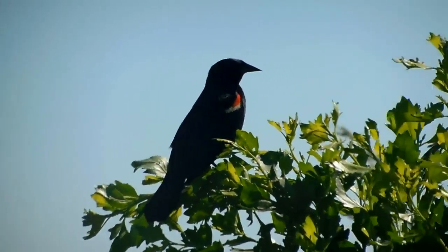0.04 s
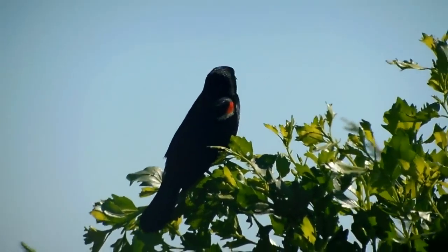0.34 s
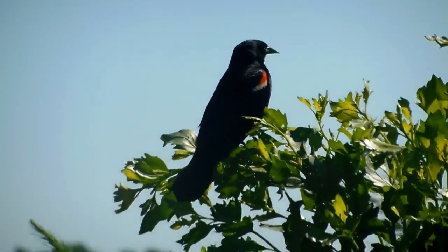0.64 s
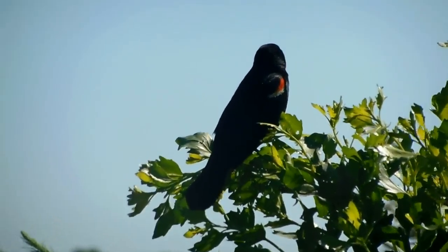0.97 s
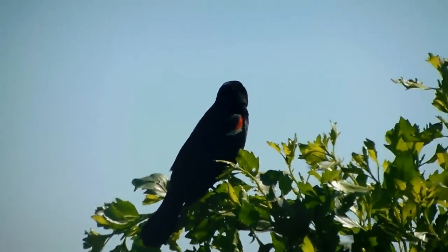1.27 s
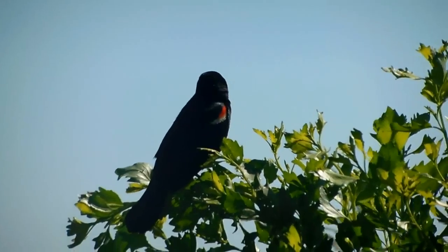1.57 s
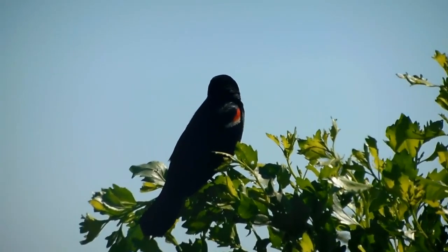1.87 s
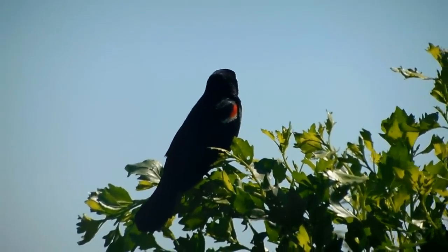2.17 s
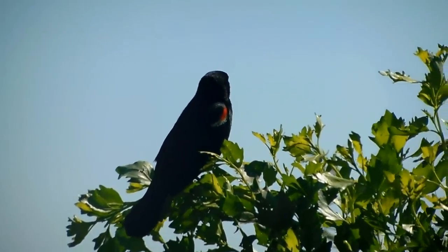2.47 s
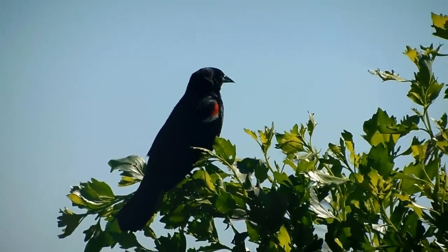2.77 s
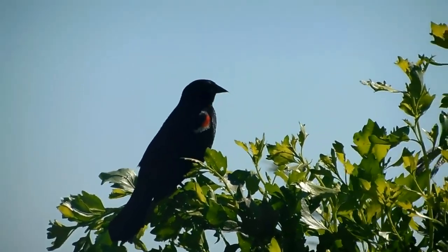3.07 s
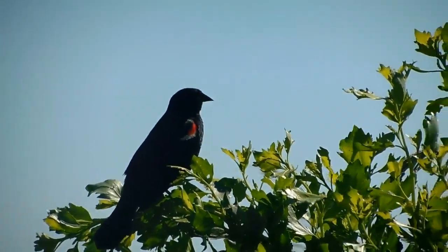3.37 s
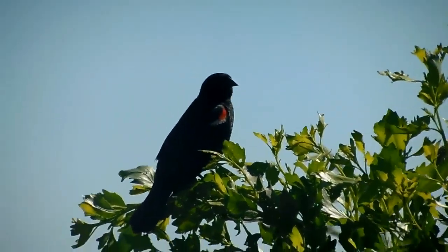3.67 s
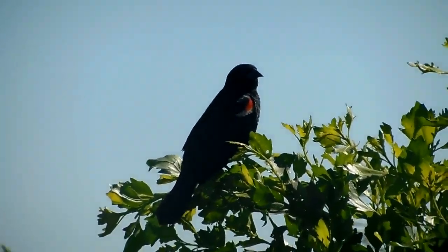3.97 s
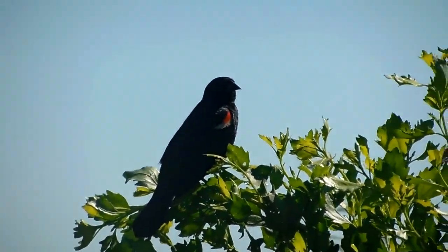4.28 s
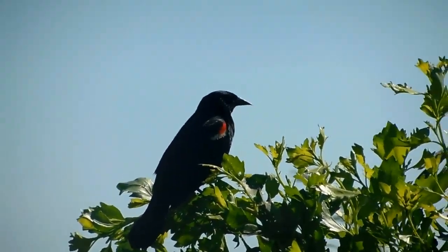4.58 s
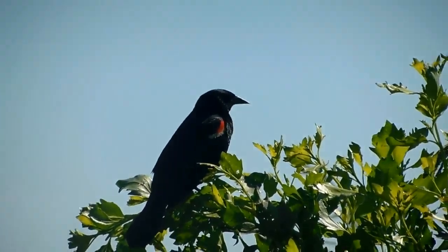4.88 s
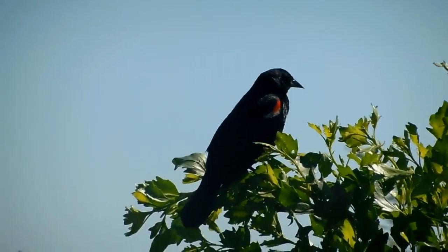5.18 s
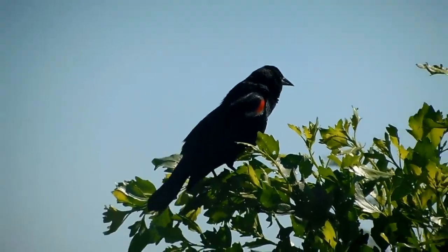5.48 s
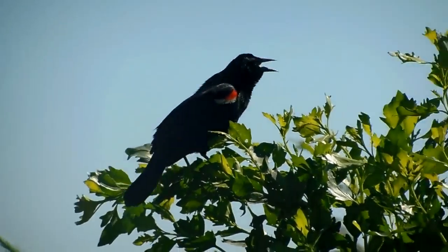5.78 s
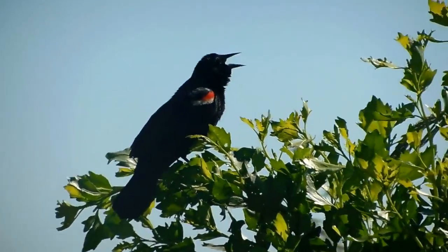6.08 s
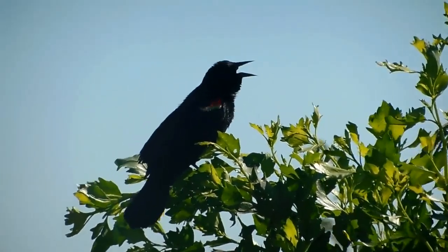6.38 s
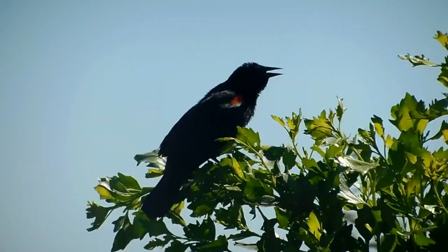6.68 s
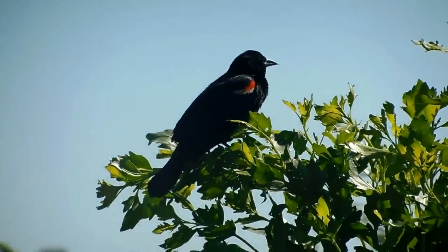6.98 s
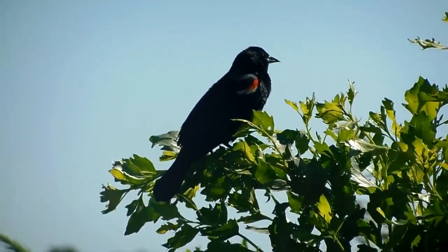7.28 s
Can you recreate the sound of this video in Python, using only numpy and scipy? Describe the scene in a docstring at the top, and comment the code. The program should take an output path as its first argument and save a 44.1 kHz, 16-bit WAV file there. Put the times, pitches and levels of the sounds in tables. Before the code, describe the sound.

In an open field with a high insect hiss, gusts thump the microphone and fade before a blackbird whistles and trills.

```python
"""An open field. From a bush a red-winged blackbird sings once, its syrinx giving two whistles,
a fast trill and a lower closing buzz. A small bird chips further off, and insects stridulate
over a soft wash of air. Before the song, turbulent wind buffets the microphone and its hardest
gust brings cracks and rustles. Now and then a camera's lens drive purrs."""
import sys
import numpy as np
from scipy import signal
from scipy.fft import rfft, irfft, next_fast_len
from scipy.io import wavfile
from scipy.ndimage import uniform_filter1d

SR = 44100
rng = np.random.default_rng(int(sys.argv[2]) if len(sys.argv) > 2 else 0)


def to_wav(sig):
    """Store sig (one row per channel, or 1-D mono) as 16-bit WAV at the path in sys.argv[1].

    Samples outside -1..1 are clipped; the rate is SR.
    """
    pcm = np.clip(np.atleast_2d(sig), -1, 1) * 32767
    pcm = np.round(pcm).astype(np.int16)
    wavfile.write(sys.argv[1], SR, pcm.T)  # frames by channels


N = 328104
T = np.arange(N) / SR

# the clear and the burry whistle: t/s, f/Hz, level/dB, second harmonic/dB re first
CLEAR_WHISTLE = [(5.765, 2680, -62, -34), (5.795, 2590, -27, -46), (5.822, 2544, -13, -58),
                 (5.847, 2572, -13.5, -58), (5.876, 2614, -22.5, -29), (5.897, 2626, -36.5, 11),
                 (5.915, 2645, -53, 16), (5.945, 2760, -40, -15)]
BURRY_WHISTLE = [(5.935, 2603, -45, -13), (5.96, 2340, -36, -27), (5.973, 2160, -29, -35),
                 (5.983, 2164, -22, -46), (6.002, 2144, -18, -47), (6.021, 2130, -22.5, -46),
                 (6.034, 2130, -39, -3), (6.052, 2330, -31, -8)]
# their upper partials: harmonic number, relative level/dB
OVERTONES = [(3, -49), (4, -52), (5, -34)]
# notes: t/s, length/s, start f/Hz, middle f/Hz, end f/Hz, relative level/dB, roughness (0-1)
SLURS = [(5.655, 0.037, 1196, 1204, 1230, -43.5, 0.16), (5.70, .065, 2280, 2180, 2200, -47, 0.33),
         (5.725, .012, 1850, 1554, 1550, -37, 0.1), (5.735, 0.03, 1630, 1330, 1270, -42.5, 0.34),
         (5.963, .0072, 2400, 2340, 2180, -29, .14), (6.051, 0.0059, 3700, 5350, 5200, -15.5, 0.2),
         (6.057, 0.0093, 4070, 4060, 4170, -17.5, 0.32), (6.548, 0.0093, 4230, 4150, 4300, -15, 0.4),
         (6.554, 0.0061, 3360, 3020, 2900, -16.5, 0.2), (6.558, .025, 5720, 5610, 5600, -21.5, 0.37),
         (6.559, 0.018, 2930, 2755, 2600, -16.5, 0.16), (6.569, .012, 2510, 2580, 2370, -11.5, 0),
         (6.581, 0.021, 2494, 2834, 2720, -17.5, 0.32)]  # single notes before, into and out of the trill
TRILL_CYCLE = [(0, .0036, 5250, 5520, 5330, -.3, .08), (.0028, .0032, 3800, 3420, 3200, -3.5, .05),
               (.0042, .0078, 3040, 2990, 2970, 1, .02), (.0074, .0052, 4450, 4350, 4200, -8, .16),
               (.0018, .003, 4600, 4300, 3950, -11.5, .2), (.006, .005, 3650, 3600, 3450, -15, .2),
               (.004, .008, 5700, 5900, 5800, -12.5, .1), (.001, .011, 2180, 2120, 2080, -26, .2),
               (.0005, .004, 10400, 10800, 10600, -3, .05)]  # in these three, t counts from the start of the group
BUZZ_CYCLE = [(.001, .008, 2550, 2850, 2650, 0, .16), (.008, .011, 2550, 2170, 2080, -3.5, .08),
              (.003, .0095, 4400, 4200, 4190, 0, .06), (.012, .0085, 4260, 4220, 4130, -.5, .07),
              (.011, .008, 3150, 3200, 2950, -5.5, .2)]
CHIP_NOTES = [(0, 0.021, 3140, 3880, 2700, -7.5, .05), (.017, 0.018, 5760, 3830, 3030, -13.5, 0.088),
              (.03, .016, 4700, 3900, 3400, -16, .1)]
# response of the open beak: f/Hz, gain/dB
BEAK_RESPONSE = [(500, -7), (1200, 2), (2900, -2.5), (4500, 1), (4900, -3.5), (5300, -2.5), (5900, -6),
                 (6500, -19), (8000, -26.5), (14000, -30.5)]
# reflections from bush and ground: delay/s, gain/dB
ECHOES = [(.0028, -8.5), (.0071, -21), (.0135, -24)]
# the small bird's chips: t/s, gain/dB
CHIPS = [(.675, -41), (6.841, -32.5), (6.933, -32), (7.06, -32), (7.168, -30), (7.315, -30.5)]
# the near insect's chirps: t/s, length/s, relative level/dB
CHIRPS = [(0.443, 0.18, -51), (1.067, 0.12, -47.5), (1.555, .16, -48), (2.235, 0.16, -49),
          (2.886, .15, -48.5), (3.382, 0.15, -48.5), (3.886, .17, -51.5), (4.469, 0.17, -53.5),
          (6.773, 0.13, -45.5)]
# strength of the wind (breeze, hard gust, calm) and of the field's background: t/s, level/dB
WIND_LEVEL = [(0, -69), (.22, -62), (.5, -43.5), (1.45, -49), (1.85, -37.5), (2.1, -51.5), (2.3, -45.5),
              (2.54, -29.5), (2.72, -30), (2.85, -46.5), (3.3, -60), (5.2, -75.5), (6.3, -70.5),
              (7.44, -75)]
FIELD_LEVEL = [(0, -53), (.25, -52.5), (.6, -47.5), (1.2, -45.5), (2.1, -44.5), (3.2, -46.7), (4.8, -53.5),
               (5.5, -53.5), (6.85, -42.5), (7.1, -46), (7.44, -47.5)]
# eddies at the microphone: t/s, strength/dB, left minus right/dB (limited to 9 either way in use)
EDDIES = [(.294, -37.5, 10), (.539, -26, 6), (.824, -31, 4), (.885, -25.5, 10), (.979, -35, 7),
          (1.025, -29.5, -12), (1.18, -25.5, 9), (1.317, -18, -5), (1.653, -29.5, 12), (1.772, -21, 12),
          (1.976, -26.5, 9), (2.207, -32.5, 2), (2.404, -25, -11), (2.466, -24.5, 11), (2.516, -16, -11),
          (2.585, -16, -13), (2.66, -17, -11), (2.688, -16.5, -18), (2.721, -18, -7), (2.759, -20, 7),
          (2.815, -27, 6), (3.0, -36, 11)]
# cracks in the hard gust: t/s, length/s, level/dB, tilt/(dB per octave)
CRACKS = [(2.578, .009, -28, -3), (2.596, .009, -26, -3), (2.607, .008, -35, -2), (2.795, .035, -40, -1)]
# moves of the lens: middle pulse t/s, width/s, gain/dB, tilt/(dB per octave)
PURRS = [(.009, 0.026, -33.5, 1), (0.537, 0.034, -29.5, 1), (4.545, 0.035, -43.5, -3.5),
         (5.856, 0.031, -36.5, -2), (6.259, 0.04, -32.5, -2), (6.699, 0.046, -31, -2)]
# spectral envelopes of the noises: f/Hz, relative level/dB
RASP_SPECTRUM = [(1500, -8), (4000, 5.5), (6500, 0), (8200, -6.5), (9800, -6), (10600, -6), (11300, -9.5),
                 (12100, -3), (12800, -14), (14000, -20)]
RUMBLE_SPECTRUM = [(15, -19), (25, -2.5), (55, 1), (120, -2.5), (200, -6), (320, -14), (600, -30),
                   (1200, -61), (3000, -78)]
BLAST_SPECTRUM = [(30, -38), (100, -5), (220, 7.5), (330, 1), (550, -6), (900, -21.5), (2000, -28),
                  (5000, -52)]
RUSTLE_SPECTRUM = [(100, -34), (300, -28), (600, 5.5), (1200, 7.5), (1900, 7), (2400, 6), (3200, -12),
                   (5000, -2), (8000, -15), (12000, -24), (14000, -31)]
PURR_SPECTRUM = [(120, -49), (220, -36), (275, 5.5), (350, -7.5), (490, 4.5), (800, -7.5), (1200, 3.5),
                 (1430, -3.5), (1650, 0.5), (1950, -1.5), (2350, -5), (3000, -18.5), (4000, -21.5),
                 (10000, -47.5)]
CHORUS_SPECTRUM = [(3500, -50), (4400, -19.5), (4750, -6), (5100, -2), (5330, 2.5), (5500, -1.5),
                   (5700, -10), (6000, -21.5), (7000, -51.5)]
AIR_SPECTRUM = [(20, -13), (60, -9), (110, -6.5), (190, -6.5), (270, 0.5), (380, -1), (550, -1),
                (850, -2.5), (1300, -3), (2300, -6.5), (4000, -11.5), (6500, -16), (10500, -20.5),
                (14000, -25.5)]
# likeness of left and right in the diffuse field: f/Hz, correlation (0-1)
COHERENCE = [(30, 0.47), (250, 0.55), (600, 0.31), (1500, 0.22), (3000, 0.18), (5300, 0.077), (9000, 0.081),
             (14000, 0.21)]


def blackbird(crack_s=5.888):
    """Self-sustained oscillation of the syrinx: whistles that crack into a rasp, a trill, a buzz."""
    whistles = whistle(CLEAR_WHISTLE, burr=.0055, burr_hz=370, shake=.0014, overtones_db=3)
    whistles += whistle(BURRY_WHISTLE, burr=.2, burr_hz=406, shake=.012, overtones_db=-10)
    slurs = phrase(SLURS, starts=[0], gains_db=[0])
    fast = beak(slurs + trill(TRILL_CYCLE, 6.0622, 6.546, rate_hz=79.9, start_db=-17, change_db=5.5))
    buzz = beak(trill(BUZZ_CYCLE, 6.603, 6.79, rate_hz=55.3, start_db=-24, change_db=-13.5, power=5.1))
    rough = fast + buzz + rasp(whistles * (T > crack_s), -27) + rasp(fast, -26) + rasp(buzz, -33)
    echoed = rough.copy()
    for delay, db in ECHOES:
        add(echoed, delay, amp(db) * rough)
    song = foliage(whistles, wet_db=-17, t60=.18) + foliage(echoed, wet_db=-12, t60=.27)
    return panned(song, .66)


def whistle(rows, burr, burr_hz, shake, overtones_db):
    """Amplitude modulation: fluttering membranes put sidebands on a near-pure tone."""
    t = np.arange(rows[0][0], rows[-1][0], 1 / SR)
    hz = curve(rows, t) * (1 + shake * wobble(len(t), 500))
    phase = 2 * np.pi * np.cumsum(hz) / SR
    level = amp(curve(rows, t, column=2))
    wave = np.sin(phase) + amp(curve(rows, t, column=3)) * np.sin(2 * phase)
    overtones = sum(amp(db + overtones_db) * np.sin(round(k) * phase) for k, db in OVERTONES)
    wave += overtones * level / level.max()
    wave *= 1 + burr * np.sin(2 * np.pi * burr_hz * t)
    out = np.zeros(N)
    add(out, t[0], np.sqrt(2) * level * wave * signal.windows.tukey(len(t), .06))
    return out


def trill(notes, start_s, end_s, rate_hz, start_db, change_db, power=1, spread_db=.4):
    """Periodic repetition of a cycle of notes; as effort grows, the high notes gain most."""
    starts = np.arange(start_s, end_s, 1 / rate_hz)
    effort_db = start_db + change_db * np.linspace(0, 1, len(starts)) ** power
    tilt_db = .42 * (effort_db - np.median(effort_db))
    chance_db = spread_db * rng.standard_normal((len(notes), len(starts)))
    return sum(phrase([row], starts, effort_db + tilt_db * np.log2(row[3] / 3000) + db)
               for row, db in zip(notes, chance_db))


def phrase(notes, starts, gains_db):
    """Superposition: the same group of notes sounds at each start."""
    out = np.zeros(N)
    for start, db in zip(starts, gains_db):
        for s, *shape in notes:
            add(out, start + s, amp(db) * note(*shape))
    return out


def note(length, start_hz, middle_hz, end_hz, db, roughness):
    """Frequency modulation: a syrinx tone glides along a parabola, roughened by random jitter."""
    size = max(round(length * SR), 16)
    parabola = np.polyfit([0, .5, 1], [start_hz, middle_hz, end_hz], 2)
    hz = np.polyval(parabola, np.linspace(0, 1, size)) * (1 + .37 * roughness * wobble(size, 900))
    phase = 2 * np.pi * (np.cumsum(hz) / SR + rng.random())
    wave = np.sin(phase) + amp(-33) * np.sin(2 * phase) + amp(-37) * np.sin(3 * phase)
    return amp(db) * wave * signal.windows.tukey(size, .44)


def beak(voice):
    """Source and filter: the open beak passes the trill's band and cuts off steeply above it."""
    return irfft(rfft(voice) * response(BEAK_RESPONSE, N), N)


def rasp(voice, gain_db, growth=.75):
    """Modulated noise: a thin rasp follows the voice's envelope by a power law."""
    envelope = abs(uniform_filter1d(abs(voice), size=60))
    return amp(gain_db) * noise(RASP_SPECTRUM) * envelope ** growth


def small_bird():
    """Frequency sweeps of a distant syrinx: each chip is an arch trailed by falling notes."""
    return foliage(phrase(CHIP_NOTES, *np.transpose(CHIPS)), wet_db=-11, t60=.25)


def wind(ceiling_db=-38.5, blast_db=-33.5, blast_growth=2.5):
    """Turbulent pressure, unrelated at each port: rumble levels off and a brighter blast takes over."""
    strength_db = curve(WIND_LEVEL)
    rumble = np.array([noise(RUMBLE_SPECTRUM) * amp(3.6 * wobble(N, 25)) for _ in range(2)])
    rumble = unit_rms(rumble) * amp(np.minimum(strength_db, ceiling_db))
    blast = np.array([noise(BLAST_SPECTRUM) * amp(4 * wobble(N, 60)) for _ in range(2)])
    blast *= amp(blast_db + blast_growth * (strength_db - strength_db.max()))
    return panned(rumble, -.5) + panned(blast, -13)  # the hard gust strikes the right port


def eddies(reference_hz=137, reference_db=-24.5, db_per_octave=17.5, wake_s=.022):
    """Pressure pulses: each eddy slaps one port harder, in a puff of rumble; stronger is quicker."""
    out = np.zeros((2, N))
    t = np.arange(-SR // 10, SR // 10) / SR
    for s, db, side_db in EDDIES:
        cycles = reference_hz * 2 ** ((db - reference_db) / db_per_octave) * t
        slap = np.sin(2 * np.pi * (cycles + rng.random())) / np.cosh(cycles / .34)
        wake = np.array([noise(RUMBLE_SPECTRUM, len(t), tilt_db=1.1) for _ in range(2)])
        wake *= np.exp(-(t / wake_s) ** 2)
        eddy = amp(db) * (amp(-2.5) * slap + amp(-13.5) * wake)
        add(out, s + t[0], panned(eddy, np.clip(side_db, -9, 9)))
    return out


def rustles(first_s=2.535, period_s=.065, length_s=.028, level_db=-44, db_per_octave=4):
    """Flow-induced flutter: the hard gust brings evenly spaced noise bursts and a few cracks."""
    flutter = [(first_s + k * period_s, length_s, level_db, db_per_octave) for k in range(8)]
    out = np.zeros((2, N))
    for s, length, db, tilt_db in [*CRACKS, *flutter]:
        size = round(length * SR)
        burst = np.array([noise(RUSTLE_SPECTRUM, size, tilt_db) for _ in range(2)])
        add(out, s, amp(db) * np.hanning(size) * burst)
    return out


def lens_drive(rate_hz=54, scrape_s=.0026, grind=.16, knock=1.5):
    """Forced vibration: periodic scrapes and knocks over a steady grind excite the drive's resonances."""
    out = np.zeros(N)
    t = np.arange(-SR // 6, SR // 6) / SR
    from_pulse = t - np.round(t * rate_hz) / rate_hz
    knocks = knock * (np.diff(np.sign(from_pulse), prepend=0) > 0)
    for s, width, db, tilt_db in PURRS:
        scrapes = rng.standard_normal(len(t)) * (grind + np.exp(-abs(from_pulse) / scrape_s))
        swell = np.exp(-abs((t - .01) / width) ** 3 / 4)
        body = unit_rms(response(PURR_SPECTRUM, len(t), tilt_db))
        add(out, s + t[0], amp(db) * irfft(rfft((knocks + scrapes) * swell) * body, len(t)))
    return panned(out, 2)


def insect_chorus(surge_hz=2.81, lull_s=.13):
    """Incoherent sum of many insects: a throbbing noise band that surges deeper in a quiet field."""
    throb_db = .2 * np.sin(2 * np.pi * 30.7 * T)
    throb_db += 1.45 * np.sin(2 * np.pi * (72 * T + .19 * wobble(N, 2)))
    field_db = curve(FIELD_LEVEL)
    depth_db = 1.45 - .12 * (field_db - field_db.mean())
    surge_db = -depth_db * np.cos(2 * np.pi * surge_hz * (T - lull_s))
    chorus = diffuse(CHORUS_SPECTRUM) * amp(field_db - 1.65 + surge_db + throb_db + 1.1 * wobble(N, 45))
    return panned(chorus, 3.5)


def near_insect(carrier_hz=5760, stroke_hz=73):
    """Stridulation: each wing stroke lifts frequency and amplitude together."""
    out = np.zeros(N)
    for s, length, db in CHIRPS:
        t = np.arange(round(length * SR)) / SR
        stroke = np.cos(2 * np.pi * stroke_hz * t)
        phase = 2 * np.pi * np.cumsum(carrier_hz + 150 * stroke + 30 * wobble(len(t), 220)) / SR
        add(out, s, amp(db - 5) * (1 + stroke) * np.sin(phase) * signal.windows.tukey(len(t), .4))
    return panned(foliage(out, wet_db=-10, t60=.15), 3.5)


def far_reel(peak_s=6.95, rise_db_per_s=7, fall_db_per_s=18):
    """Frequency modulation: a thin reeling insect song comes and goes, more scattered than direct."""
    hz = 7080 + 130 * np.sin(2 * np.pi * 52 * T) + 90 * wobble(N, 300)
    level_db = -61.5 - np.maximum(rise_db_per_s * (peak_s - T), fall_db_per_s * (T - peak_s))
    reel = amp(level_db) * np.sin(2 * np.pi * np.cumsum(hz) / SR)
    return foliage(reel, wet_db=5.5, t60=.3)


def air():
    """Diffuse ambient noise: the soft, wavering wash of the open field."""
    return panned(diffuse(AIR_SPECTRUM) * amp(curve(FIELD_LEVEL) + .76 * wobble(N, 14)), .48)


def foliage(x, wet_db, t60):
    """Scattering: leaves return a tail, different in each channel, that falls 60 dB in t60 seconds."""
    t = np.arange(SR // 2) / SR
    taps = rng.standard_normal((2, len(t))) * (rng.random((2, len(t))) < .1)
    taps *= amp(-60 * t / t60) * (t > .002)
    tail = signal.fftconvolve(x[None], taps / np.linalg.norm(taps[0]), axes=1)[:, :N]
    return x + amp(wet_db) * tail


def diffuse(spectrum):
    """Partial coherence: noise from all around is only partly alike in the two channels."""
    alike = np.clip(over_log_hz(COHERENCE, np.fft.rfftfreq(N, 1 / SR)), 0, 1)
    left, other = noise(spectrum), noise(spectrum)
    right = irfft(alike * rfft(left) + np.sqrt(1 - alike ** 2) * rfft(other), N)
    return np.array([left, right])


def noise(spectrum, size=N, tilt_db=0):
    """Spectral shaping of white noise, rms 1."""
    padded = next_fast_len(size)
    shaped = rfft(rng.standard_normal(padded)) * response(spectrum, padded, tilt_db)
    return unit_rms(irfft(shaped, padded)[:size])


def wobble(size, cutoff_hz):
    """Random fluctuation: low-passed noise, rms about 1."""
    padded = next_fast_len(size + 2048)
    hz = np.fft.rfftfreq(padded, 1 / SR)
    smooth = rfft(rng.standard_normal(padded)) / (1 + (hz / cutoff_hz) ** 4)
    return unit_rms(irfft(smooth, padded))[:size]


def response(spectrum, size, tilt_db=0):
    """Frequency response: a gain for each FFT bin, tilted by tilt_db per octave."""
    hz = np.fft.rfftfreq(size, 1 / SR)
    return amp(over_log_hz(spectrum, hz) + tilt_db * np.log2(hz + 1))


def over_log_hz(rows, hz):
    """Linear interpolation over log frequency."""
    f, value = np.transpose(rows)
    return np.interp(np.log(hz + 1), np.log(f + 1), value)


def curve(rows, t=T, column=1):
    """Linear interpolation of one column in time."""
    rows = np.array(rows)
    return np.interp(t, rows[:, 0], rows[:, column])


def panned(x, side_db):
    """Localisation by level difference, left minus right."""
    left, right = np.broadcast_to(x, (2, x.shape[-1]))
    return np.array([left * amp(side_db / 2), right * amp(-side_db / 2)])


def add(mix, s, sound):
    """Superposition of a sound on the mix at time s."""
    start = round(s * SR)
    sound = sound[..., max(-start, 0):]
    part = mix[..., max(start, 0):][..., :sound.shape[-1]]
    part += sound[..., :part.shape[-1]]


def amp(db):
    """Decibels to amplitude ratio."""
    return 10 ** (np.asarray(db) / 20)


def unit_rms(x):
    """Normalisation to rms 1."""
    return x / np.sqrt(np.mean(x ** 2) + 1e-20)


def scene():
    """Superposition of all sources at the microphone."""
    animals = blackbird() + small_bird() + insect_chorus() + near_insect() + far_reel()
    return animals + air() + wind() + eddies() + rustles() + lens_drive()


def record(dry, cutoff_hz=14150):
    """Band limiting by a steep low-pass filter."""
    lowpass = signal.firwin(511, cutoff_hz, window=("kaiser", 9), fs=SR)
    return signal.oaconvolve(dry, lowpass[None], "same")


dry = scene()
out = record(dry)
to_wav(out)
```